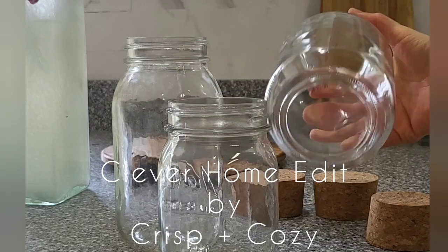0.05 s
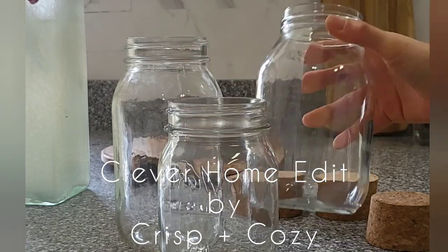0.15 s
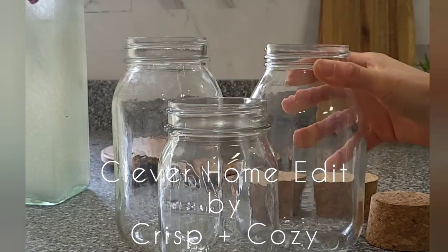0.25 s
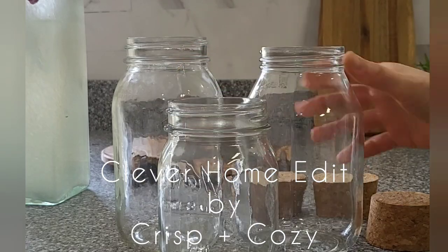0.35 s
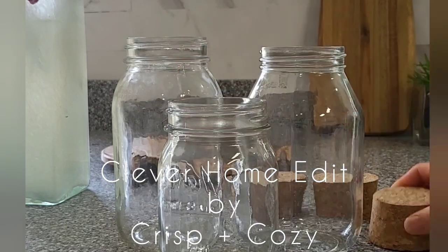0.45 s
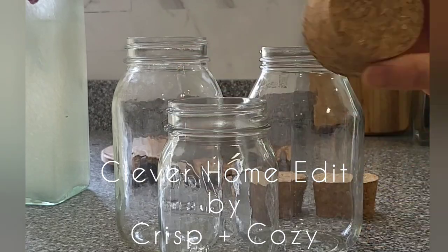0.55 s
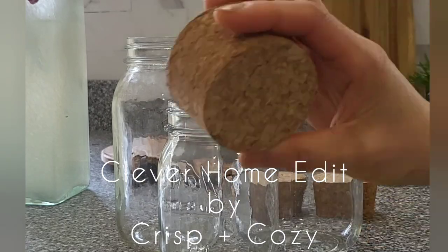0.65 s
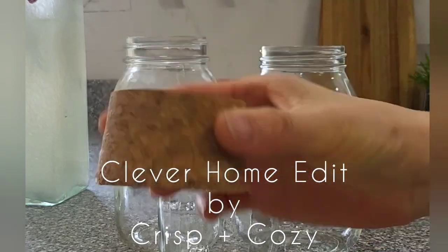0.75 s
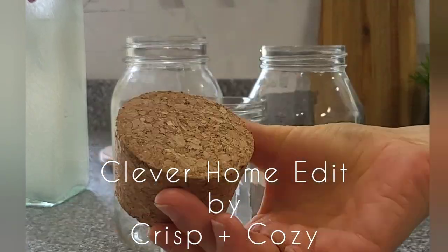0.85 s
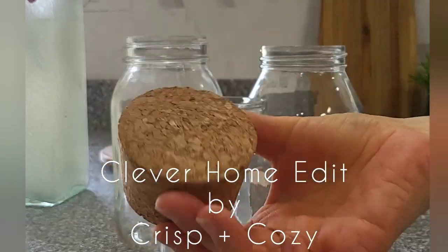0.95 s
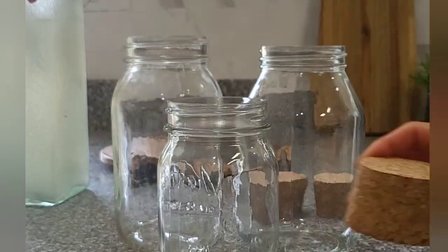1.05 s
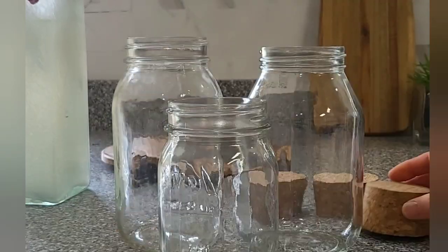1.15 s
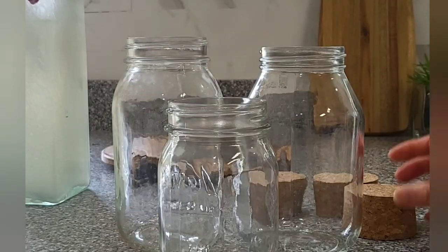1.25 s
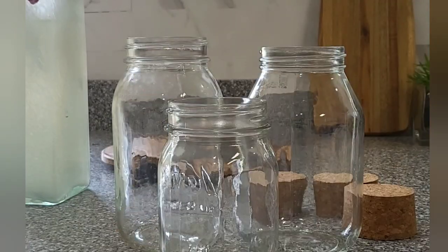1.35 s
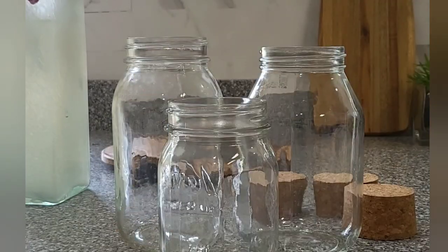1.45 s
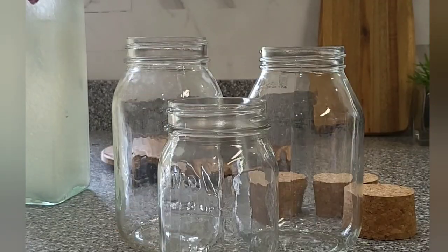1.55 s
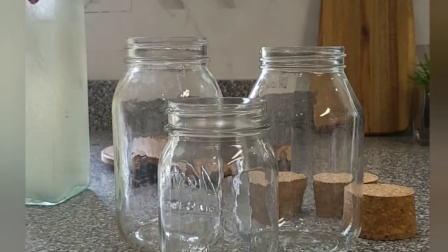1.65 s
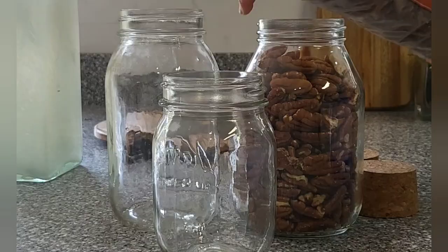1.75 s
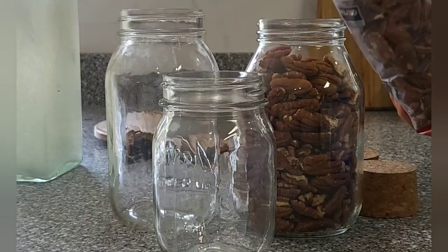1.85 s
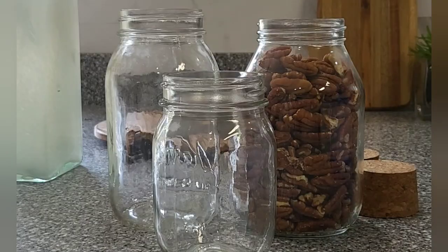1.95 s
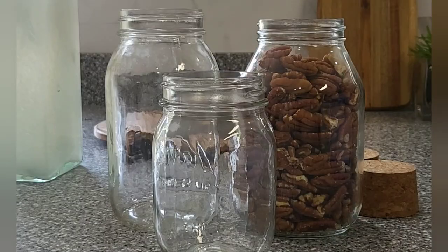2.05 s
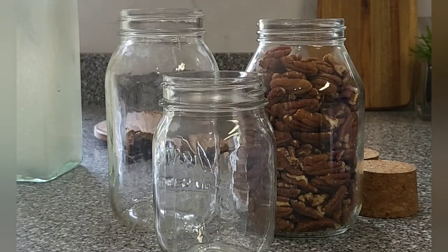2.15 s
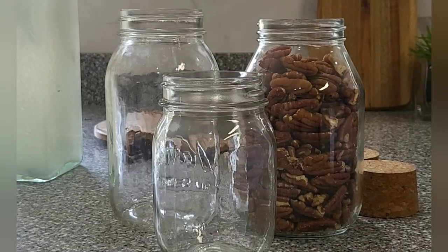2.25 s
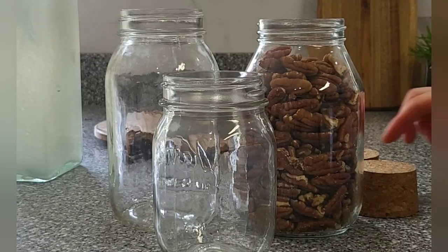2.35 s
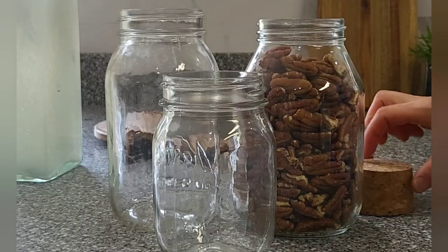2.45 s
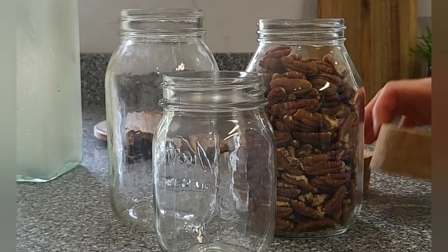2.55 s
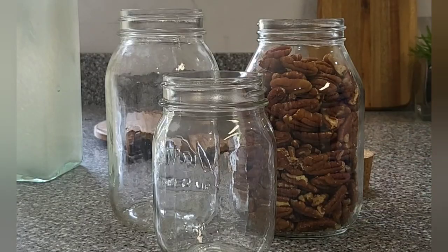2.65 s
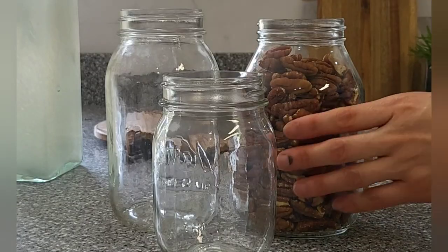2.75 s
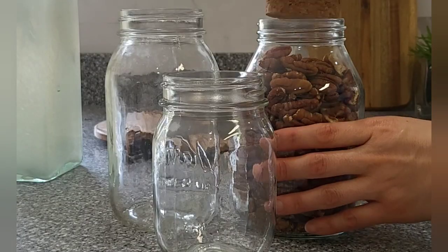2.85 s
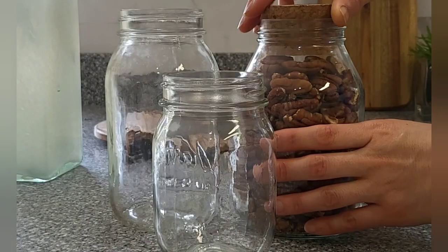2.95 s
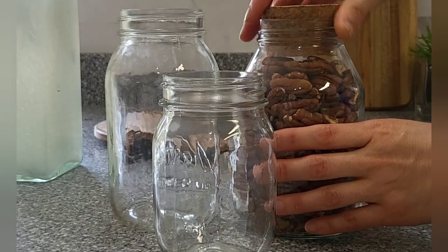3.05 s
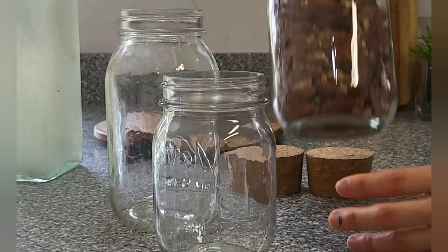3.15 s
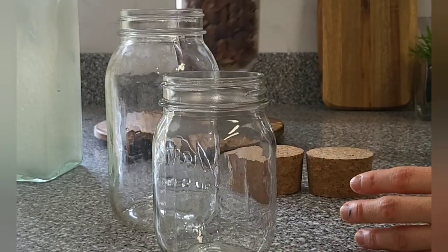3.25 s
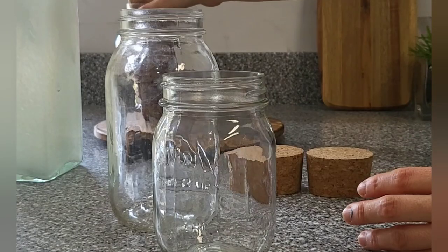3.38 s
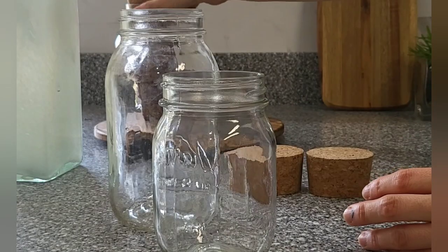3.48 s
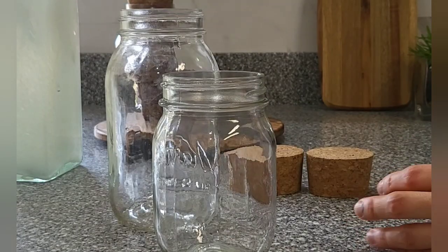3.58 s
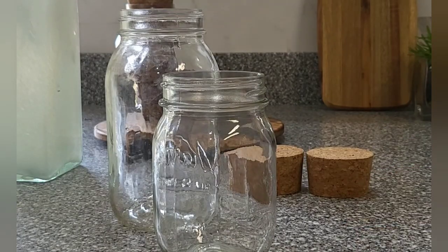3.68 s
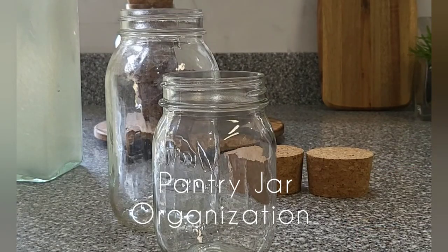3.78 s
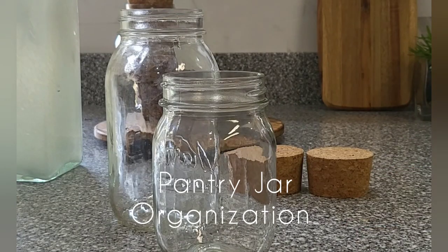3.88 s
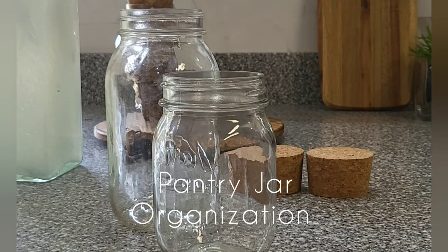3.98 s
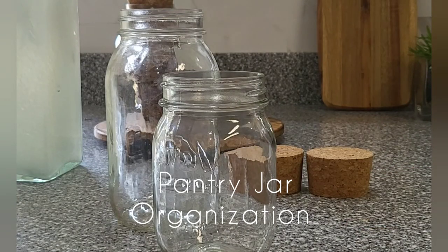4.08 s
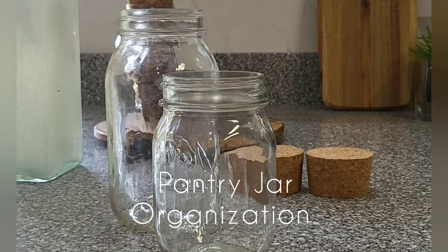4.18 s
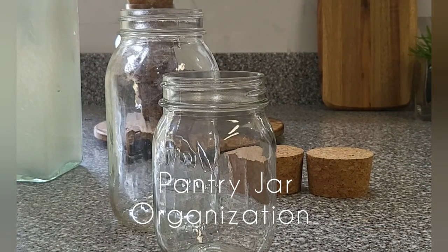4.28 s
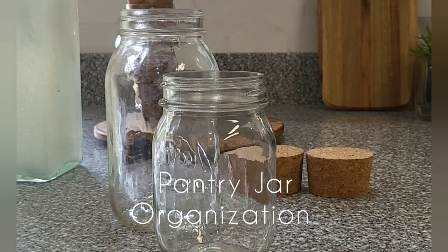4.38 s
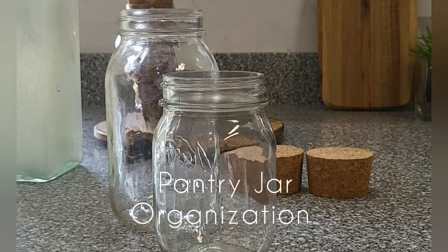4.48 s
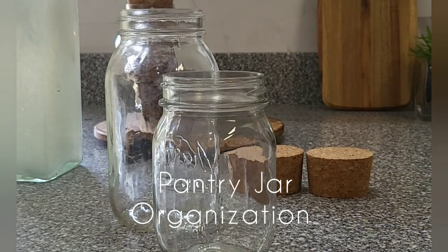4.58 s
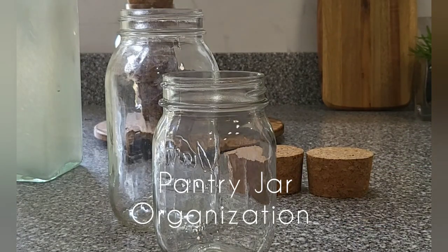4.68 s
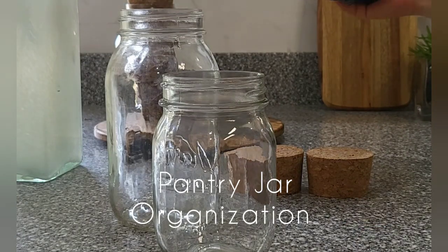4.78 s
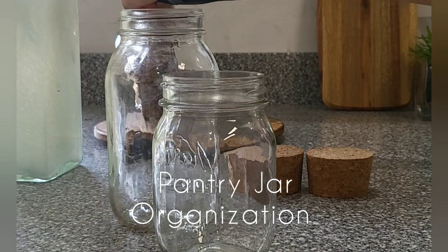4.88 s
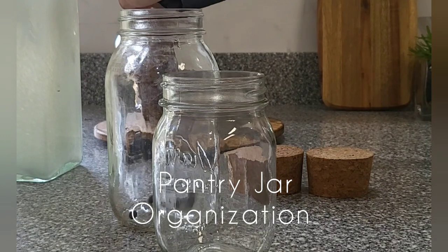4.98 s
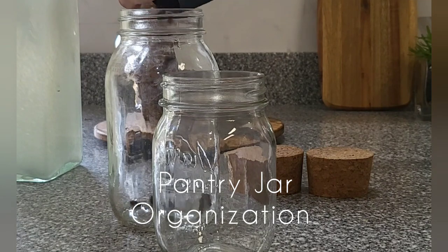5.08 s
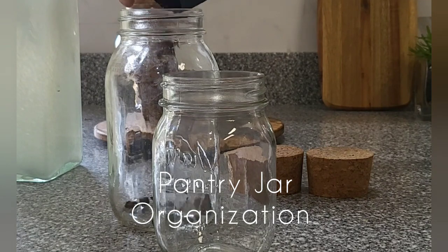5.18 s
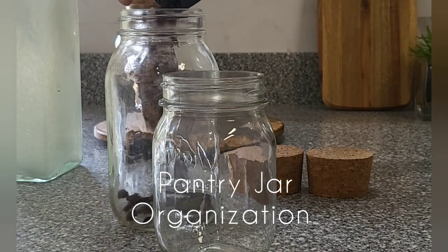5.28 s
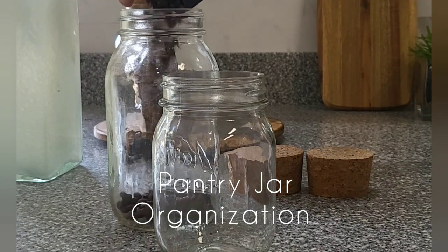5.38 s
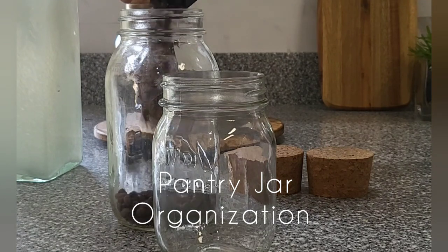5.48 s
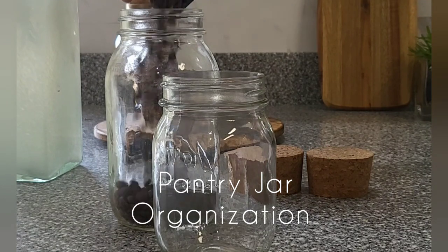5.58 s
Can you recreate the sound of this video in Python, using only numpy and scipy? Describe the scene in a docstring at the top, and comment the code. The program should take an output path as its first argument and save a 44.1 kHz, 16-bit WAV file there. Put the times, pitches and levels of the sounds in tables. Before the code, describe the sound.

Jars and a cork are set down on stone, a stiff food bag crumples, and coffee beans clatter brightly into an empty jar.

```python
"""Close by, a glass jar is set down on a stone counter, then a cork lid lands: modes ring under contact bursts.
A stiff food bag crumples (filtered swarms of impulses and sharp snaps); the jar knocks, a filled jar settles.
The bag crumples again, coffee beans slide down it and rattle into an empty jar: impulses ring glass modes;
the jar is nudged once more. Quick reflections follow each sound; appliance rumble and hiss run throughout."""
import sys
import numpy as np
from scipy import signal
from scipy.fft import rfft, irfft, next_fast_len
from scipy.io import wavfile
from scipy.ndimage import uniform_filter1d

SR = 44100
rng = np.random.default_rng(int(sys.argv[2]) if len(sys.argv) > 2 else 0)


def digitize_waveform(pressure):
    """Quantize a signal to 16-bit integers and store it at the path in sys.argv[1].

    Rows of a 2-D input are taken as channels; values are limited to [-1, 1].
    """
    field = np.atleast_2d(pressure).T
    bounded = np.clip(field, -1, 1)
    quanta = np.round(bounded * 32767).astype(np.int16)
    wavfile.write(sys.argv[1], SR, quanta)


N = 248283

# bean clumps hitting the glass: t/s, level/dB
BEAN_CLUMPS = [(4.9894, -33), (5.026, -39), (5.068, -29), (5.099, -39), (5.1477, -30), (5.169, -39),
               (5.206, -43), (5.234, -28), (5.3061, -26.5), (5.3265, -35), (5.4223, -29.5), (5.4902, -31),
               (5.6044, -28)]
# bean stream swelling and thinning: t/s, level/dB
BEAN_STREAM = [(4.96, -41.5), (5.21, -40), (5.32, -28), (5.45, -31), (5.63, -35)]
# empty jar, wall bending modes: f/Hz, level/dB, t60/s
WALL_MODES = [(2864, -18, .08), (2990, -18, .08), (3553, -11, .07), (3620, -16, .06), (4194, -19, .1),
              (4689, -11, .08), (4830, -5, .05), (4874, -2, .13), (4960, -6, .03), (5035, -5, .08),
              (5160, -9, .05), (5313, -11, .1), (6272, -21, .06), (7257, -14, .06)]
# empty jar, high shell modes: f/Hz, level/dB, t60/s
SHELL_MODES = [(8172, -12, .11), (8425, -10, .14), (8872, 1, .09), (9216, 0, .05), (9582, -1, .12),
               (9814, -1, .12), (11130, -7, .08), (11440, -7, .08), (11900, -6, .06), (12345, 1, .08),
               (12720, -5, .08), (13190, 2, .12), (13490, 1, .1), (14295, 1, .1), (14610, 1, .1),
               (15160, -1, .1), (15410, -1, .06)]
# clatter of bean on glass, spectrum: f/Hz, level/dB
CLATTER_SPECTRUM = [(2000, -16.5), (4000, -28), (5500, -12), (8200, -9.5), (9200, -5.5), (10400, -6),
                    (12500, -5), (14200, -0.5), (16000, -9.5)]
# beans rushing down the tipped bag, then trickling: t/s, level/dB
SLIDE_LEVEL = [(4.76, -55), (4.88, -32.5), (4.945, -34), (5.04, -48), (5.63, -50)]
# beans tumbling along the bag wall, spectrum: f/Hz, level/dB
SLIDE_SPECTRUM = [(50, -5.5), (130, -1), (250, 4), (350, 7), (620, 4), (800, 2.5), (1060, 5), (1450, -2),
                  (2400, -3), (3200, -10), (4200, -7), (7000, -31.5)]
# beans brushing the film, spectrum: f/Hz, level/dB
BRUSH_SPECTRUM = [(2000, -24), (3300, 11.5), (6500, 13.5), (8200, 3), (12500, 10), (16000, 3)]
# bag flexes: full level from t/s, hold/s, level/dB, brightness/dB
FLEXES = [(1.526, 0.014, -67.5, 0), (1.589, 0.013, -65.5, 9.5), (1.666, .018, -58.5, -4),
          (1.82, 0.0011, -47, -4), (1.865, 0.031, -48.5, -5), (1.91, 0.01, -45.5, -11.5),
          (1.955, 0.039, -38.5, 1.5), (2.025, 0.003, -39, 4.5), (2.079, 0.0048, -56, -3.5),
          (2.14, 0.0078, -45, -7), (2.161, 0.0058, -35, 2.5), (3.753, 0.048, -66.5, 0.5),
          (3.941, 0.0074, -62.5, -7.5), (3.998, 0.03, -43.5, -2), (4.112, .03, -53, -7),
          (4.15, 0.071, -47, -1.5), (4.275, 0.012, -42.5, 6), (4.318, 0.051, -48, -6),
          (4.415, 0.027, -51.5, 1), (4.453, 0.011, -44, 4.5), (4.471, 0.033, -39, -1),
          (4.535, 0.0099, -44, 6.5), (4.571, 0.021, -50.5, -13.5), (4.622, 0.018, -44, -9),
          (4.674, 0.0037, -42, 10), (4.716, 0.0088, -48.5, -10.5), (4.841, .015, -54, 12)]
# single creases snapping through: t/s, strength/dB, relative treble/dB
CREASE_SNAPS = [(1.8234, -17, 5.5), (1.9581, -18, 21), (1.98, -8, 12.5), (2.1614, -15, 8), (4.181, -16, -1),
                (4.2112, -9, -9.5), (4.276, -25, 11), (4.35, -15, 2), (4.4499, -11, 9), (4.4878, -3, -8),
                (4.4989, -9, -7)]
# hollow body of the bag, spectrum: f/Hz, level/dB
BODY_SPECTRUM = [(50, -13.5), (120, 2.5), (200, 2.5), (330, 5.5), (450, 2.5), (600, 1), (1100, -2.5),
                 (1500, -7.5), (2200, -48)]
# crackle of its film, spectrum: f/Hz, level/dB
CRACKLE_SPECTRUM = [(900, -24), (1600, 0), (2400, -.5), (3300, -3.5), (4600, -2.5), (6800, -7), (9000, -19),
                    (13000, -36)]
# fizz of its film, spectrum: f/Hz, level/dB
FIZZ_SPECTRUM = [(5000, -35), (7700, 0), (9000, -2), (11000, -1), (14000, -4), (16000, -6), (17500, -40)]
# jar set down or nudged, at its hardest contact: t/s, level/dB, cut-off f/Hz, relative worktop boom/dB, rocking time/s
JAR_KNOCKS = [(.257, -21, 2000, -17, 0.012), (.326, -27.5, 500, -18, .008), (2.429, -23, 430, -20, .008),
              (2.93, -33.5, 200, -6, 0.014), (5.314, -21.5, 650, -48, 0.0023)]
# jar standing on stone, mean modes: f/Hz, level/dB, t60/s
JAR_MODES = [(309.5, -7, 0.092), (373, 5.5, 0.051), (447, -9, 0.02), (590, 8, 0.018), (730, -11, 0.02),
             (980, 13.5, 0.0083), (1090, -23, 0.023), (1200, -4, .025), (1400, -10.5, 0.097),
             (1630, -3, 0.032), (2090, -6.5, 0.078), (2600, -5, .025), (3380, -28.5, 0.022),
             (4420, -3, 0.073)]
# cork lid landing and bouncing: t/s, level/dB, cut-off f/Hz, relative worktop boom/dB
CORK_BLOWS = [(1.161, -20, 1200, -29), (1.1665, -27.5, 1050, -20)]
# cork lid, mean modes: f/Hz, level/dB, t60/s
CORK_MODES = [(294, 10.5, 0.086), (338, 2.5, 0.12), (556, 19.5, 0.011), (725, 7, 0.016), (884, 9, 0.029),
              (960, -7, 0.033), (2400, -7, .015)]
# filled jar settling further back, hardest contact: t/s, level/dB, cut-off f/Hz, relative worktop boom/dB, rocking time/s
FULL_JAR_SETTLES = [(3.402, -29.5, 1590, -8.5, 0.011)]
# filled jar, mean modes: f/Hz, level/dB, t60/s
FULL_JAR_MODES = [(247, -2, .06), (321, -2, .05), (530, -12, .03), (775, -12, .04), (981, -2, .03),
                  (1266, -1, .028), (1335, -3, .03), (1655, -4, .028), (2400, -16, .02), (3560, -13, .025)]
# worktop and cabinet modes: f/Hz, level/dB, t60/s
WORKTOP_MODES = [(64, 8, 0.12), (116.5, -6, 0.2)]
# background levels: t/s, rumble/dB, hiss/dB, drone/dB
BACKGROUND_LEVELS = [(0, -59, -68.5, -88), (.6, -58.5, -68.5, -73), (1.7, -56.5, -69.5, -59),
                     (2.55, -59.5, -73.5, -67), (2.95, -55.5, -75, -54), (4, -57, -70.5, -61)]
# appliance rumble, spectral density: f/Hz, level/dB
RUMBLE_SPECTRUM = [(20, -9), (32, -21), (54, 4), (70, -4), (95, -8), (130, -3.5), (155, -3), (185, -12.5),
                   (230, -11.5), (330, -10.5), (450, -20), (650, -28), (1000, -30.5), (2000, -70.5)]
# appliance drone, spectral density: f/Hz, level/dB
DRONE_SPECTRUM = [(80, -35), (116, 1.5), (129, 9), (142, -14), (165, -15), (184, 3.5), (230, -50)]
# hiss, spectral density: f/Hz, level/dB
HISS_SPECTRUM = [(300, 4.5), (1000, -0.5), (1800, 1), (2500, -4.5), (3200, -8), (5000, -3.5), (6800, -3),
                 (8200, -15), (10500, -8), (12500, -20.5), (16000, -16)]

LEAD_DB = 21.5  # first bean of a clump, added to the clump level
SHOWER_S, REBOUND_S = 0.023, 0.085  # amplitude decay of a clump's shower and of its wall rebounds
WALL_DB = -6.5  # jar wall ring re impacts
BRUSH_DB = -10.5  # re tumbling beans
FLEX_ATTACK_S, FLEX_RELEASE_S = 0.0055, 0.016
BODY_DB, FIZZ_DB = 4, -11.5  # re crackle, at zero brightness
BODY_LOSS_DB_PER_DB = 0.51  # body lost per dB of brightness
# level drop per rocking time before and after the hardest contact; drop that halves the cut-off
TOUCH_DB, SETTLE_DB, SOFTEN_DB = 4.5, 9, 22
TOP_HZ = 15900


def pour():
    """Beans strike bare glass in clumps and a stream; rebounds keep the wall ringing."""
    beans = grains(rate_hz=380, spread_db=3, even_s=.022)
    leads = np.zeros(N)
    for t_s, db in BEAN_CLUMPS:
        add(leads, t_s, amp([db + LEAD_DB]))
    impacts = beans * showers(SHOWER_S) + leads
    rebounds = beans * showers(REBOUND_S) + leads
    wall = glass(rebounds * amp(WALL_DB), WALL_MODES, right_db=-2.5, apart=.8)
    shell = glass(impacts, SHELL_MODES, right_db=-8.5, apart=1.5)
    # contacts also ring a crowd of short-lived modes in bean and glass
    spots = []
    for _ in range(6):
        spot = kitchen(direct_db=1, shade_db=-11, early_t60_s=.055, tail_db=-14)
        spots.append(convolve(spot, burst(.006)))
    clatter = colour(scatter(impacts, spots), CLATTER_SPECTRUM)
    return wall + amp(-.5) * shell + amp(-9.0) * clatter


def showers(decay_s):
    """Falling-bean amplitude: the stream plus a dying shower per clump, summed in power."""
    t_s = np.arange(N) / SR
    stream_db, = curve(BEAN_STREAM)
    flow, = curve([(4.95, 0), (4.99, 1)])
    power = (flow * amp(stream_db)) ** 2
    for start_s, db in BEAN_CLUMPS:
        power += amp(db) ** 2 * (t_s >= start_s) * np.exp(-2 * np.abs(t_s - start_s) / decay_s)
    return np.sqrt(power)


def glass(impacts, modes, right_db, apart):
    """Beans land on different spots, so each drives each mode at each port with another strength."""
    first = np.flatnonzero(impacts)[0]
    out, energy = np.zeros((2, N)), 0
    for mode in modes:
        shared, left, right = rng.standard_normal((3, N - first))
        strength = shared + apart * np.array([left, right])
        tone = ring(*mode)
        out[:, first:] += convolve(impacts[first:] * strength, tone)
        energy += np.sum(tone ** 2) * (1 + apart ** 2)
    return out * amp([[0], [right_db]]) / np.sqrt(energy)


def slide(spots):
    """The bag tips: beans tumble along its wall and brush the film, as filtered impulses."""
    level_db, = curve(SLIDE_LEVEL)
    tipped, = curve([(4.72, 0), (4.76, 1)])
    tumbles = scatter(grains(rate_hz=1100, spread_db=1.5, even_s=0.034), spots)
    brush = amp(BRUSH_DB) * colour(tumbles, BRUSH_SPECTRUM)
    return tipped * amp(level_db) * (colour(tumbles, SLIDE_SPECTRUM) + brush)


def bag(spots):
    """Each flex lets go a swarm of tiny buckles that drum on the hollow bag and crackle in its film."""
    t_s = np.arange(N) / SR
    power = np.zeros((3, N))
    for start_s, hold_s, db, bright_db in FLEXES:
        rise = (t_s - start_s) / FLEX_ATTACK_S
        fall = (start_s + hold_s - t_s) / FLEX_RELEASE_S
        swell = np.exp(2 * np.minimum(np.minimum(rise, fall), 0))
        voice_db = np.array([[BODY_DB - BODY_LOSS_DB_PER_DB * bright_db], [0], [FIZZ_DB + bright_db]])
        power += amp(db + voice_db) ** 2 * swell
    swarms = np.sqrt(power) * grains(rate_hz=1700, spread_db=3.5, even_s=.015)
    # loud creases face the microphone: more direct sound
    facing = kitchen(direct_db=0, shade_db=-8, early_t60_s=.04, tail_db=-20)
    out = np.zeros((2, N))
    spectra = (BODY_SPECTRUM, CRACKLE_SPECTRUM, FIZZ_SPECTRUM)
    for swarm, snap, spectrum in zip(swarms, snaps(), spectra):
        out += colour(scatter(swarm, spots) + convolve(snap, facing), spectrum)
    return out


def snaps():
    """A crease flips: one sharp impulse, weighted for body, crackle and fizz."""
    out = np.zeros((3, N))
    for t_s, db, treble_db in CREASE_SNAPS:
        voice_db = np.array([[-.7], [treble_db / 2 - 2.5], [treble_db - 17.5]])
        add(out, t_s, amp(db + voice_db))
    return out


def knock(blows, modes, crack_db, tick_db, direct_db, tail_db):
    """Blows ring object and worktop; a softer contact loses treble, grit adds a faint tick."""
    out = np.zeros((2, N))
    boom = butter(sum(ring(*mode) for mode in WORKTOP_MODES), 46, "high")
    for t_s, db, contact_hz, boom_db in blows:
        # the contact point shifts from blow to blow, and the modes with it
        shifts = 1 + .025 * rng.standard_normal(len(modes))
        body = sum(ring(hz * shift, mode_db, t60_s) for shift, (hz, mode_db, t60_s) in zip(shifts, modes))
        body = butter(body / np.abs(body).max(), 192, "high")
        crack = amp(crack_db) * butter(burst(0.0058), 750, "high")
        tick = amp(tick_db) * butter(burst(0.028), 4700, "low", order=1)
        spot = kitchen(direct_db=direct_db, shade_db=-7, early_t60_s=0.034, tail_db=tail_db)
        thud = convolve(butter(body + crack, contact_hz, "low") + tick, spot)
        add(out, t_s, amp(db) * (thud + amp(boom_db) * boom))
    return out


def rocking(set_downs):
    """A base never lands flat: it touches, hits hardest, chatters to rest; weaker contacts are softer."""
    blows = []
    for t_s, db, contact_hz, boom_db, rock_s in set_downs:
        steps = (np.arange(-3, 7) + rng.uniform(-.3, .3, 10)) / 3  # in rocking times
        for step in steps:
            drop_db = max(-step * TOUCH_DB, step * SETTLE_DB)
            softened_hz = contact_hz * .5 ** (drop_db / SOFTEN_DB)
            blows.append((t_s + step * rock_s, db - drop_db, softened_hz, boom_db))
    return blows


def kitchen(direct_db, shade_db, early_t60_s, tail_db):
    """Stereo response of one spot: direct sound, later and duller on the right, reflections, short tail."""
    direct = np.zeros((2, SR // 4))
    direct[0, 0] = direct[1, 15] = 1  # right lags 15 samples
    echoes = np.array([burst(early_t60_s) + amp(tail_db) * burst(0.22) for _ in direct])
    # small nearby surfaces scatter only the shorter waves
    echoes = butter(np.roll(echoes, int(.001 * SR), axis=1), 630, "high")
    # direct_db is a shelf above 810 Hz, shade_db a left-right split above 5500 Hz
    shelf = (amp(direct_db) - 1) * butter(direct, 810, "high", order=1)
    ports = direct + shelf + amp(2.5) * echoes
    treble = butter(ports, 5500, "high", order=1)
    return ports + (amp([[-shade_db / 2], [shade_db / 2]]) - 1) * treble


def background():
    """Appliance rumble and drone shared by both ports; fainter rumble and thin hiss differ between them."""
    rumble_db, hiss_db, drone_db = curve(BACKGROUND_LEVELS)
    shared = amp(rumble_db) * noise(RUMBLE_SPECTRUM) + amp(drone_db) * noise(DRONE_SPECTRUM)
    ports = []
    for port_db in (2.1, .4):
        own = amp(rumble_db - 14) * noise(RUMBLE_SPECTRUM) + amp(hiss_db) * noise(HISS_SPECTRUM)
        ports.append(amp(port_db) * (shared + own))
    return np.vstack(ports)


def noise(spectrum):
    """Steady Gaussian noise of the given spectrum, rms 1."""
    x = colour(rng.standard_normal(N), spectrum)
    return x / np.sqrt(np.mean(x ** 2))


def grains(rate_hz, spread_db, even_s):
    """Random impulses of uneven size, power evened over spans of even_s."""
    sizes = rng.choice([-1, 1], N) * amp(spread_db * rng.exponential(size=N))
    x = (rng.random(N) < rate_hz / SR) * sizes
    power = uniform_filter1d(x ** 2, max(int(even_s * SR), 1))
    return x / np.sqrt(np.maximum(power, rate_hz / SR))


def scatter(impacts, spots):
    """Each impulse comes from one of several spots, so reflections never colour them all alike."""
    place = rng.integers(len(spots), size=N)
    size = next_fast_len(N + SR // 4)
    spectrum = sum(rfft(impacts * (place == k), size) * rfft(spot, size) for k, spot in enumerate(spots))
    return irfft(spectrum, size)[:, :N]


def fade(t60_s):
    """Exponential decay, cut at a quarter second."""
    return np.exp(-np.log(1000) * np.arange(SR // 4) / SR / t60_s)


def ring(hz, db, t60_s):
    """One decaying sine mode."""
    decay = fade(t60_s)
    return amp(db) * decay * np.sin(2 * np.pi * hz * np.arange(len(decay)) / SR)


def burst(t60_s):
    """Decaying noise of unit energy: a crowd of modes too close to tell apart."""
    decay = fade(t60_s)
    return decay * rng.standard_normal(len(decay)) / np.linalg.norm(decay)


def colour(x, points, size=4096):
    """Minimum-phase filter through the (Hz, dB) points, unit energy gain."""
    hz, db = np.transpose(points)
    freqs_hz = np.maximum(np.fft.rfftfreq(size, 1 / SR), 1)
    gain_db = np.interp(np.log(freqs_hz), np.log(hz), db)
    # folding the cepstrum makes the response causal
    cepstrum = irfft(np.log(amp(gain_db)))
    cepstrum[1:size // 2] *= 2
    cepstrum[size // 2 + 1:] = 0
    response = irfft(np.exp(rfft(cepstrum)))
    return convolve(x, response / np.linalg.norm(response))


def butter(x, hz, kind, order=2):
    """Butterworth low-pass or high-pass."""
    sos = signal.butter(order, min(hz, SR / 2 - 1), kind, fs=SR, output="sos")
    return signal.sosfilt(sos, x)


def convolve(x, response):
    """Pass a sound through a response, keeping its length; either may be stereo."""
    return signal.fftconvolve(np.atleast_2d(x), np.atleast_2d(response), axes=1)[:, :x.shape[-1]]


def add(track, t_s, sound):
    """Mix a sound into a track from time t_s."""
    i = int(t_s * SR)
    part = sound[..., :max(N - i, 0)]
    track[..., i:i + part.shape[-1]] += part


def curve(rows):
    """Each column of a timed table, joined by straight lines."""
    t_s, *columns = np.transpose(rows)
    return [np.interp(np.arange(N) / SR, t_s, column) for column in columns]


def amp(db):
    """Decibels to gain."""
    return 10 ** (np.asarray(db) / 20)


def scene():
    """Everything on the counter, heard from just in front of the jars."""
    jar = knock(rocking(JAR_KNOCKS), JAR_MODES, crack_db=7, tick_db=-12, direct_db=-8.5, tail_db=-8)
    cork = knock(CORK_BLOWS, CORK_MODES, crack_db=-11, tick_db=-10, direct_db=-1.5, tail_db=-11.5)
    full_jar = knock(rocking(FULL_JAR_SETTLES), FULL_JAR_MODES,
                     crack_db=8, tick_db=-18, direct_db=-3, tail_db=-8.5)
    bag_spots = [kitchen(direct_db=-1.5, shade_db=-5.5, early_t60_s=.055, tail_db=-13) for _ in range(7)]
    handling = bag(bag_spots) + slide(bag_spots)
    return jar + cork + full_jar + handling + pour() + background()


def record(dry):
    """Left port 1 dB more sensitive than right; a steep low-pass cuts the very top."""
    ports = dry * amp([[.5], [-.5]])
    sos = signal.ellip(10, .2, 80, TOP_HZ, fs=SR, output="sos")
    return signal.sosfilt(sos, ports)


dry = scene()
out = record(dry)
digitize_waveform(out)
```